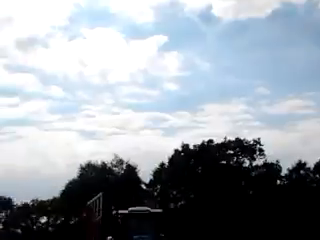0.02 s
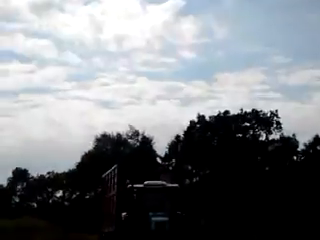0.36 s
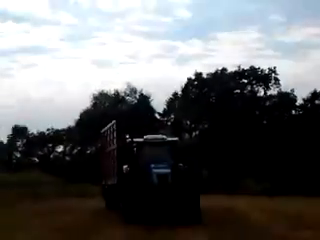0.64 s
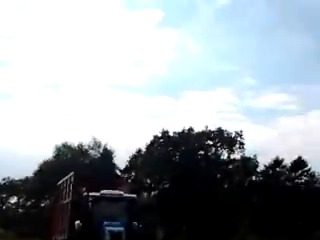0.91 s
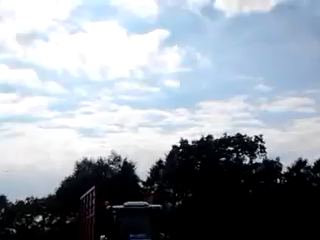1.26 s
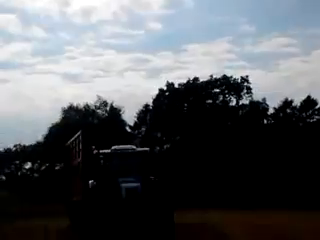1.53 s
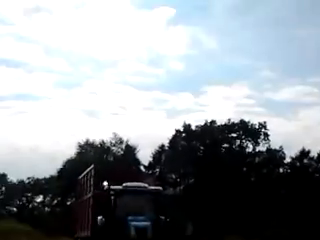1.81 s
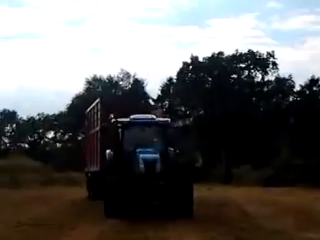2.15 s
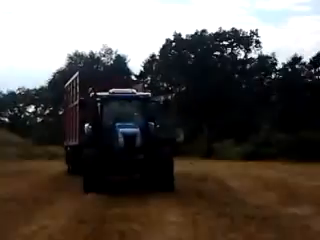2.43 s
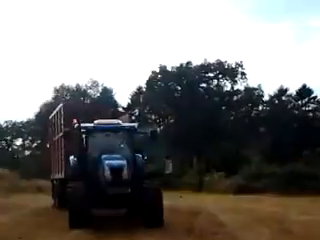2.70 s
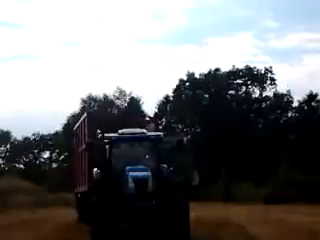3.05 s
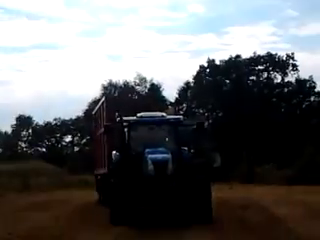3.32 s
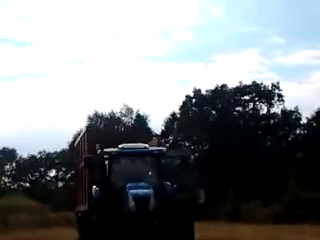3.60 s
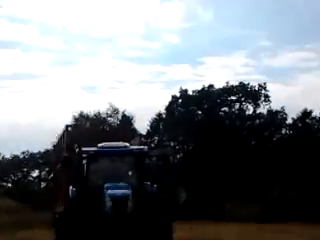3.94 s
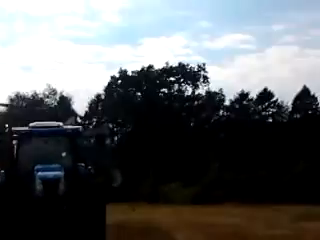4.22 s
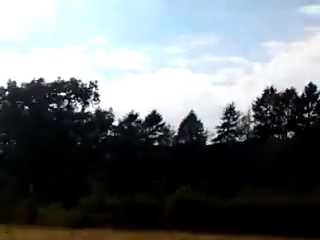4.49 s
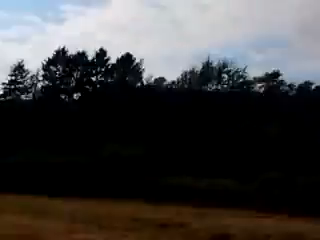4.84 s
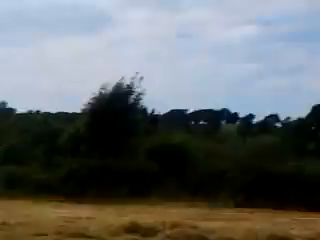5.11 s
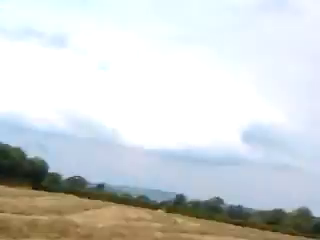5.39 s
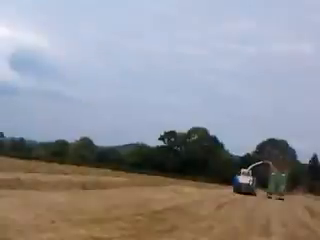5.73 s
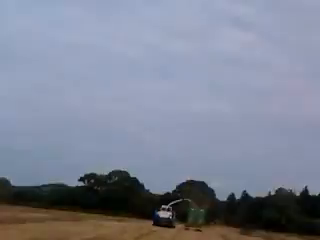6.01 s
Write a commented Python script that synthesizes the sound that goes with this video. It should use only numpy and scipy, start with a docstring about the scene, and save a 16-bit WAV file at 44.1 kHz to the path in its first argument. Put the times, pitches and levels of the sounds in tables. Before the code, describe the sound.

A tractor approaches with a knocking diesel engine, whining and hissing, while wind gusts buffet the microphone and a distant harvester drones.

```python
"""A six-cylinder diesel idles close by, each firing ringing the block, one cylinder harder than the rest.
A tractor with a trailer drives up over the stubble, humming, whining and hissing at crankshaft pace,
with airy squeals and dry scuffs. A forage harvester drones far off.
Gusts buffet the microphone and push it into overload."""
import sys
import numpy as np
from scipy import signal
from scipy.fft import rfft, irfft, next_fast_len
from scipy.io import wavfile
from scipy.ndimage import uniform_filter1d, map_coordinates

SR = 44100
rng = np.random.default_rng(int(sys.argv[2]) if len(sys.argv) > 2 else 0)


def transcribe(u):
    """Save the signal u as a 16-bit wav file named by the first command-line argument.

    u: samples, shape (n,) or (channels, n), limited to [-1, 1]; the rate is SR.
    q: integer samples, one column per channel.
    """
    v = np.clip(np.atleast_2d(u).T, -1, 1)
    q = np.round(v * 32767).astype(np.int16)
    wavfile.write(sys.argv[1], SR, q)


N = 267246
T = np.arange(N) / SR


# Knock per cylinder, in firing order: level/dB
CYLINDER_DB = [1, -4, -7, -5.5, -1.5, -4.5]
# Block modes: f/Hz, level/dB, t60/s
BLOCK_MODES = [(760, 0, 0.016), (1111, 5, 0.063), (1175, 9, 0.047), (1278, 2.5, 0.073)]
# Exhaust harmonics: multiple of firing rate, level/dB
EXHAUST_ORDERS = [(1, 1), (2, 2.5), (3, -7.5)]
# Gear and belt rush: f/Hz, level/dB
RUSH_SPECTRUM = [(200, 2), (450, -3), (700, 2.5), (900, 1.5), (1300, 1), (1700, 2), (2080, -3), (2350, 1.5),
                 (4000, -4), (6000, -20.5), (9000, -45), (13000, -63.5)]
# Levels as the microphone turns: t/s, rush/dB, knock/dB, exhaust/dB
DIESEL_LEVELS = [(0, -34.5, -44, -37.5), (1.3, -35.5, -43.5, -32), (2.2, -38.5, -44.5, -43),
                 (3.25, -36.5, -42.5, -39), (3.8, -36.5, -42, -37), (4.45, -36, -41.5, -32),
                 (5.3, -35.5, -41.5, -33.5), (6.06, -34, -61, -32.5)]

def idling_diesel():
    """Each firing rings the block and puffs through the exhaust, over a rush of gears and belts."""
    cycle_s, first_knock_s = .14415, .1256
    hard_knocks_s, hard_db = np.array([3.308, 4.461, 4.99, 5.182]), 2
    rush_db, knock_db, exhaust_db = curves(DIESEL_LEVELS)
    count = len(CYLINDER_DB)
    firings = (T - first_knock_s) / cycle_s * count + count
    index = firings.astype(int)
    age_s = (firings - index) * cycle_s / count
    hard = ((hard_knocks_s - first_knock_s) / cycle_s * count + count).astype(int)
    force_db = np.array(CYLINDER_DB)[index % count] + rng.standard_normal(index.max() + 1)[index]
    blow = amp(force_db + hard_db * np.isin(index, hard)) * (1 - np.exp(-age_s / .003))
    ring = 0
    for hz, db, t60_s in BLOCK_MODES:
        spread_db, phase = rng.standard_normal((index.max() + 1, 2))[index].T  # new per firing
        ring += amp(db + spread_db - 60 * age_s / t60_s) * np.sin(2 * np.pi * hz * age_s + phase)
    knock = amp(knock_db) * coloured(blow * ring, [(200, -32), (600, 4.5), (2000, -5), (6000, -51)])
    puffs = sum(amp(db + 2.1 * wobble(10)) * np.sin(2 * np.pi * (order * firings + rng.random()))
                for order, db in EXHAUST_ORDERS)
    clatter = 1 + 1.3 * blow * np.exp(-age_s / .007)
    rush = amp(rush_db) * unit(clatter) * drifting(RUSH_SPECTRUM, patchy_db=1)
    return knock + amp(exhaust_db) * puffs + rush


# Airflow: t/s, hiss/dB, sizzle/dB
AIR_LEVELS = [(0, -43.5, -42.5), (0.28, -40.5, -52), (0.43, -33.5, -41.5), (0.69, -35, -43.5),
              (0.88, -31, -42), (1.03, -31.5, -35.5), (1.33, -30.5, -42.5), (1.55, -29.5, -34),
              (1.7, -34.5, -39), (1.9, -35.5, -39), (2.3, -36.5, -38.5), (2.63, -33.5, -32),
              (2.76, -30, -44.5), (2.97, -41.5, -44), (3.75, -41.5, -55.5), (4.3, -39.5, -44),
              (4.68, -36, -44), (4.9, -40.5, -41.5), (5.22, -40.5, -40.5), (5.37, -36, -38),
              (5.62, -35.5, -38), (5.72, -52, -43), (6.06, -42.5, -46.5)]
# Airflow spectra: f/Hz, level/dB
HISS_SPECTRUM = [(2000, -33), (3000, -11.5), (3500, -2.5), (4000, -3), (4450, 1.5), (5000, 2), (5400, -0.5),
                 (6300, -2.5), (7200, -4.5), (9000, -29), (13000, -73)]
SIZZLE_SPECTRUM = [(4500, -1), (5800, 6.5), (7000, 2), (7900, 7.5), (8800, -2.5), (9500, -9), (10500, -24),
                   (13000, -68)]
# Hollow band centre: t/s, f/Hz
HOLLOW_CENTRE = [(2.0, 3440), (2.7, 3563), (4.6, 3420)]

def tractor_hiss():
    """Air rushes through the tractor, pulsing once per crank turn; two narrow bands swell with it."""
    crank_hz = 33.6
    hiss_db, sizzle_db = curves(AIR_LEVELS)
    hollow_hz, = curves(HOLLOW_CENTRE)
    crank_rad = 2 * np.pi * (crank_hz * T + .034 * wobble(1.1))
    pulse = 1 + .085 * np.cos(crank_rad) + .055 * np.cos(2 * crank_rad)
    hiss = amp(hiss_db) * drifting(HISS_SPECTRUM, patchy_db=1.5)
    sizzle = amp(sizzle_db + 1) * drifting(SIZZLE_SPECTRUM, patchy_db=2.5)
    hollow = amp(.69 * hiss_db - 20.5 + 2.5 * wobble(12)) * narrow(hollow_hz, half_width_hz=320)
    whistle = amp(hiss_db / 2 - 25.5 + 1.1 * wobble(8)) * narrow(4440, half_width_hz=330)
    return pulse * amp(.65 * wobble(21.88)) * (hiss + sizzle + hollow + whistle)


# Squeals: t/s, hold/s, f/Hz, half-width/Hz, level/dB
SQUEAL_EVENTS = [(0.853, 0.19, 4670, 500, -31.5), (1.762, 0.05, 4700, 400, -34.5),
                 (2.44, 0.37, 3565, 120, -42.5), (4.06, 0.059, 4430, 180, -37),
                 (4.215, 0.16, 4670, 600, -37.5), (5.077, 0.026, 4780, 240, -32.5),
                 (5.357, 0.29, 3850, 200, -41), (5.752, 0.15, 3400, 120, -43.5),
                 (5.927, 0.017, 3530, 220, -33)]

def squeals():
    """Airy machinery squeals: narrow noise bands that start and stop quickly."""
    return sum(amp(db) * swell(t, hold, rise_db_s=550, fall_db_s=650) * narrow(hz, half_width)
               for t, hold, hz, half_width, db in SQUEAL_EVENTS)


# Breeze between gusts: t/s, level/dB
BREEZE_LEVEL = [(0, -27.5), (0.5, -18), (1.24, -24), (1.7, -12.5), (1.93, -24), (2.15, -10.5),
                (2.36, -24.5), (2.8, -20), (3.0, -20), (4.35, -21), (4.62, -34.5), (5.3, -30), (6.06, -24)]
# Gusts: t/s, hold/s, buffet/dB, flutter re buffet/dB
GUST_EVENTS = [(0.118, 0.23, -15, -6), (0.56, 0.064, -24, 0), (0.761, 0.13, -17, -4.5),
               (1.32, 0.058, -10.5, -10), (1.478, 0.13, -14, -12.5), (1.623, 0.21, -15, -1.5),
               (2.053, 0.089, -16, -0.5), (2.17, 0.065, -20.5, 1.5), (2.48, 0.25, -11.5, -6),
               (2.726, 0.18, -15, -5), (3.153, 0.51, -19.5, -20), (3.478, 0.11, -15.5, -2.5),
               (3.693, 0.2, -11, -5), (3.917, 0.21, -15, -6.5), (4.476, 0.021, -14, -7.5),
               (4.804, 0.198, -18.5, -19.5), (5.02, 0.04, -9.5, -11), (5.516, 0.15, -20.5, -3),
               (5.732, 0.34, -25.5, 1.5)]
# Loud tearing and sideways grazing: t/s, hold/s, level/dB
TEAR_EVENTS = [(0.12, 0.14, -31.5), (1.325, 0.039, -21.5), (2.715, 0.046, -23.5), (3.8, 0.058, -24.5),
               (5.88, 0.074, -28)]
GRAZE_EVENTS = [(5.535, 0.14, -31.5), (5.81, 0.099, -27.5), (5.885, 0.055, -20.5)]
# Single eddies: t/s, level/dB
SLAP_EVENTS = [(0.562, -6), (1.17, -8), (1.344, 2), (1.365, 1), (1.667, 2.5), (2.101, -10), (2.65, -3.5),
               (2.744, -8), (2.878, -4.5), (3.475, -3.5), (3.677, -7), (3.806, -0.5), (5.012, -7.5)]
THUMP_EVENTS = [(0.2, -14), (0.565, -9.5), (1.288, -12), (2.118, -11), (2.664, -6), (3.2, -13.5),
                (3.395, -11), (3.497, -8), (4.27, -10), (4.408, -17), (4.528, -11), (4.765, -17),
                (4.84, -10.5), (4.925, -14.5), (5.068, -4.5), (5.148, -17)]
# Turbulence spectra: f/Hz, level/dB
BUFFET_SPECTRUM = [(12, -17), (25, -5.5), (45, -2.5), (85, 1.5), (160, 2), (240, -4.5), (330, -15),
                   (500, -20.5), (900, -57), (2000, -119)]
FLUTTER_SPECTRUM = [(90, -45.5), (200, -1.5), (310, 0), (450, -6), (650, -15), (900, -23.5), (1400, -37.5),
                    (2500, -50), (5000, -117)]
TEAR_SPECTRUM = [(200, -16.5), (420, 0.5), (650, -1), (950, -8), (1400, -21), (2200, -23.5), (5000, -83.5)]
THUMP_SPECTRUM = [(30, -13), (85, 4), (180, -4), (300, -14), (600, -43), (1500, -100)]

def wind():
    """On the microphone port big eddies rumble and tear, small ones flutter, single ones slap or thump."""
    slopes = dict(rise_db_s=283.5, fall_db_s=343)
    slap_s, thump_s = .0067, .0099
    breeze = amp(curves(BREEZE_LEVEL)[0])
    big_gusts = swells([(t, hold, db) for t, hold, db, _ in GUST_EVENTS], **slopes)
    small_gusts = swells([(t, hold, db + rel) for t, hold, db, rel in GUST_EVENTS], **slopes)
    big = np.hypot(breeze, big_gusts)
    small = np.hypot(amp(-8.5) * breeze, small_gusts)
    churn = wobble(45)
    rolling = eddies(BUFFET_SPECTRUM, span_s=.06)
    buffet = big * amp(-.67 + 1.2 * churn) * rolling
    tear_gain = np.hypot(amp(-15) * small, swells(TEAR_EVENTS, **slopes))
    tear = tear_gain * amp(2.4 * churn) * unit(rolling ** 2 * noise(TEAR_SPECTRUM))  # at the crests
    flutter = small * amp(.35 + 1.52 * churn) * eddies(FLUTTER_SPECTRUM, span_s=.097)
    graze_spectrum = [(250, -7), (420, 14), (620, 3), (850, -7), (1100, -36), (3000, -70)]
    graze = swells(GRAZE_EVENTS, **slopes) * eddies(graze_spectrum, span_s=.021)
    slap_body = amp(-11) * eddies(FLUTTER_SPECTRUM, span_s=.015)
    slap_edge = amp(-20) * eddies(TEAR_SPECTRUM, span_s=.0092)
    slap = pushes([(t + slap_s, db) for t, db in SLAP_EVENTS], slap_s) * (slap_body + slap_edge)
    thump = pushes(THUMP_EVENTS, thump_s) * eddies(THUMP_SPECTRUM, span_s=.018)
    return buffet + flutter + tear + graze + slap + thump


# Scuffs: t/s, hold/s, f/Hz, level/dB
SCUFF_EVENTS = [(3.172, 0.26, 2920, -42), (4.55, 0.28, 2950, -39), (4.622, 0.08, 6400, -43),
                (4.74, 0.37, 1810, -39), (4.937, 0.19, 1796, -37), (5.066, 0.066, 6100, -37)]
# High hiss bursts: t/s, hold/s, level/dB
HIGH_HISS_EVENTS = [(4.69, 0.077, -48.5), (5.16, 0.33, -51.5)]

def scuffs_and_high_hiss():
    """Dry scuffs, like stubble or cloth, and faint, thin bursts of very high hiss."""
    scuffs = sum(amp(db) * swell(t, hold, rise_db_s=196, fall_db_s=198) * narrow(hz, half_width_hz=1300)
                 for t, hold, hz, db in SCUFF_EVENTS)
    hiss_gain = swells(HIGH_HISS_EVENTS, rise_db_s=156, fall_db_s=279) * amp(wobble(30))
    hiss = drifting([(7000, -22), (9000, 10), (12300, 5), (13500, -10), (15500, -9)], patchy_db=4)
    return scuffs * amp(2.3 * wobble(45)) + hiss_gain * hiss


# Drone levels: t/s, tractor hum/dB, gear whine/dB, harvester/dB
DRONE_LEVELS = [(0, -35, -64, -34), (0.95, -32, -36.5, -40), (1.3, -36, -31, -42), (2.4, -32, -61, -37),
                (3.2, -31, -50.5, -38.5), (4.15, -36, -30.5, -47), (4.65, -36, -48, -40.5),
                (5.3, -41.5, -43, -35.5), (6.06, -37, -72, -30)]
# Shaft tones: f/Hz, level/dB
HUM_TONES = [(140, -5), (241, 2.5), (479, -20.5), (665, -21.5), (985, -25)]
WHINE_TONES = [(787, -10), (2345, -18.5)]
HARVESTER_TONES = [(296, -1), (608, -17.5), (667, -26.5), (1441, -22.5)]
# Harvester roar: f/Hz, level/dB
ROAR_SPECTRUM = [(280, -13.5), (380, -0.5), (450, -5.5), (660, 5), (900, -12.5), (2000, -49)]
# Roar, rising as the microphone turns toward it: t/s, level/dB
ROAR_RISE = [(4.2, -57), (4.7, -41), (5.4, -42)]

def distant_machines():
    """The tractor hums and its gears whine; the harvester drones and roars through moving air."""
    hum_db, whine_db, harvester_db = curves(DRONE_LEVELS)
    hum = amp(hum_db) * drone(HUM_TONES, waver=.0027, fading_db=1, rough_rad=1)
    whine = amp(whine_db) * drone(WHINE_TONES, waver=.00286, fading_db=1.5, rough_rad=.15)
    harvester = amp(harvester_db) * drone(HARVESTER_TONES, waver=.00425, fading_db=3.5, rough_rad=.41)
    roar = amp(curves(ROAR_RISE)[0]) * drifting(ROAR_SPECTRUM, patchy_db=2)
    return hum + whine + harvester + roar


def drone(tones, waver, fading_db, rough_rad):
    """Tones of one shaft waver together; the wind fades and roughens each on its own."""
    clock_s = T + waver * np.cumsum(wobble(7)) / SR
    total = 0
    for hz, db in tones:
        gain = amp(db + fading_db * wobble(12)) * np.sqrt(2)
        total += gain * np.sin(2 * np.pi * (hz * clock_s + rng.random()) + rough_rad * wobble(40))
    return total


def amp(db):
    """Decibels to gain."""
    return 10 ** (np.asarray(db) / 20)


def unit(x):
    """Scale to rms 1."""
    return x / np.sqrt(np.mean(x ** 2) + 1e-20)


def curves(rows):
    """Per-sample curve of each column after the time."""
    times, *columns = np.transpose(rows)
    return [np.interp(T, times, column) for column in columns]


def wobble(rate_hz):
    """Smooth random curve with knots at rate_hz."""
    return map_coordinates(rng.standard_normal(int(N * rate_hz / SR) + 4), [T * rate_hz])


def swell(t, hold_s, rise_db_s, fall_db_s):
    """Gain of 1 from t for hold_s, with slopes in dB/s either side."""
    return amp(-rise_db_s * np.maximum(t - T, 0) - fall_db_s * np.maximum(T - t - hold_s, 0))


def swells(rows, rise_db_s, fall_db_s):
    """Joint gain of (t/s, hold/s, level/dB) swells; powers add."""
    return np.sqrt(sum((amp(db) * swell(t, hold, rise_db_s, fall_db_s)) ** 2 for t, hold, db in rows))


def pushes(rows, half_width_s):
    """Joint gain of bell-shaped (t/s, level/dB) pushes of air."""
    return sum(amp(db) * np.exp(-((T - t) / half_width_s) ** 2) for t, db in rows)


def filtered(x, response):
    """Apply a gain given as a function of frequency."""
    size = next_fast_len(N + 8192)
    return irfft(rfft(x, size) * response(np.fft.rfftfreq(size, 1 / SR)), size)[:N]


def coloured(x, spectrum):
    """Shape by (f/Hz, level/dB) points, to rms 1."""
    f, db = np.transpose(spectrum)
    return unit(filtered(x, lambda hz: amp(np.interp(np.log(hz + 1), np.log(f), db))))


def noise(spectrum):
    """Coloured noise of rms 1."""
    return coloured(rng.standard_normal(N), spectrum)


def drifting(spectrum, patchy_db):
    """Noise through moving air: patches of its spectrum swell and fade."""
    bins = signal.stft(rng.standard_normal(N), nperseg=512)[2]
    patches = uniform_filter1d(rng.standard_normal(bins.shape), size=7, axis=0)
    patches = uniform_filter1d(patches, size=20, axis=1)
    patchy = signal.istft(bins * amp(patchy_db * unit(patches)), nperseg=512)[1][:N]
    return coloured(patchy, spectrum)


def eddies(spectrum, span_s):
    """Turbulence: rough from moment to moment, even in strength over span_s."""
    x = noise(spectrum)
    power = np.abs(uniform_filter1d(x ** 2, int(span_s * SR) + 1))
    return unit(x / np.sqrt(power + .057))


def narrow(centre_hz, half_width_hz):
    """Noise of rms 1 in one wide-skirted resonance whose centre may move."""
    phase = 2 * np.pi * np.cumsum(centre_hz * np.ones(N)) / SR
    skirts = lambda hz: np.exp(-(hz / 3500) ** 2) / (1 + (hz / half_width_hz) ** 2)
    return unit(sum(filtered(rng.standard_normal(N), skirts) * wave(phase) for wave in (np.cos, np.sin)))


def scene():
    """Machines and wind at one microphone."""
    mix = distant_machines() + wind() + idling_diesel() + tractor_hiss()
    return (mix + squeals() + scuffs_and_high_hiss())[None]


def record(dry):
    """The strongest gusts flatten softly against the microphone's ceiling; the top band is cut."""
    ceiling, hardness, corner_hz, top_hz = .71, 8, 4200, 15700
    x = dry[0]
    excess = x - x / (1 + np.abs(x / ceiling) ** hardness) ** (1 / hardness)
    x = x - filtered(excess, lambda hz: np.exp(-(hz / corner_hz) ** 2))
    return filtered(x, lambda hz: hz < top_hz)[None]


dry = scene()
out = record(dry)
transcribe(out)
```